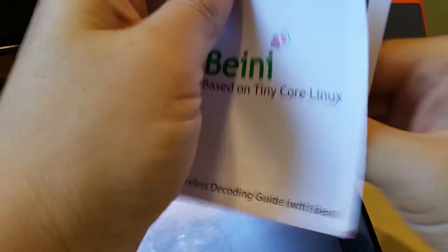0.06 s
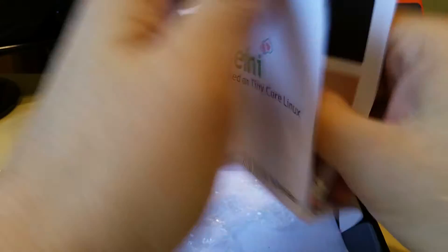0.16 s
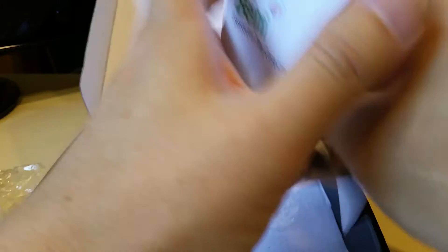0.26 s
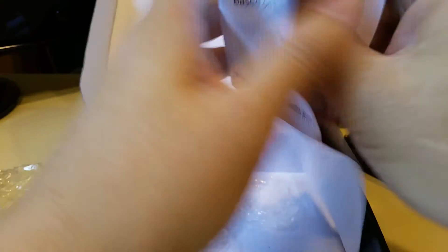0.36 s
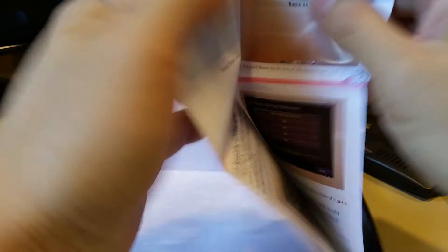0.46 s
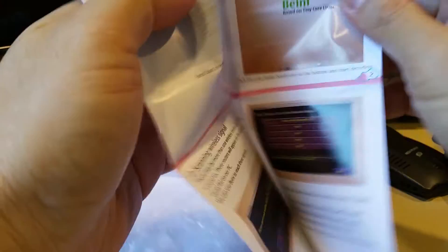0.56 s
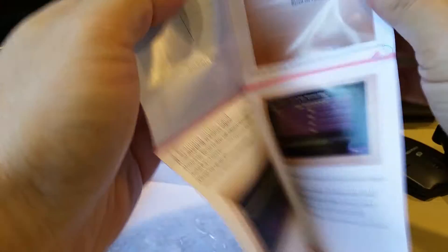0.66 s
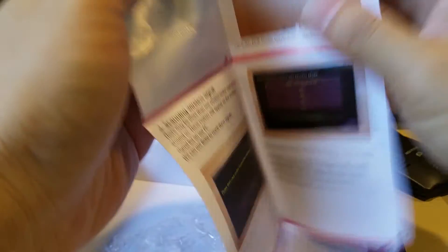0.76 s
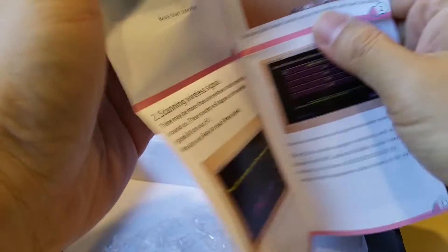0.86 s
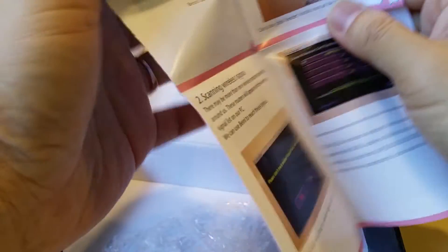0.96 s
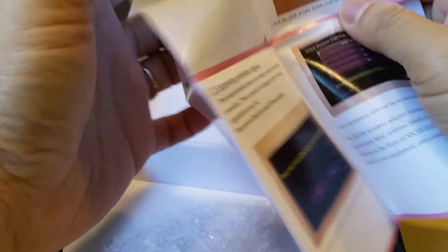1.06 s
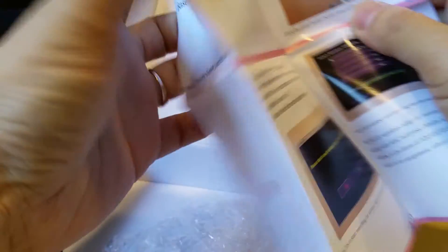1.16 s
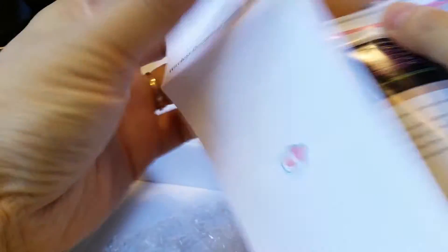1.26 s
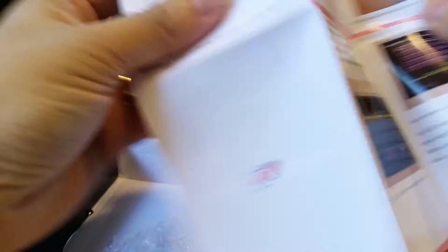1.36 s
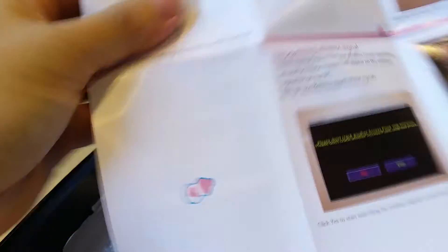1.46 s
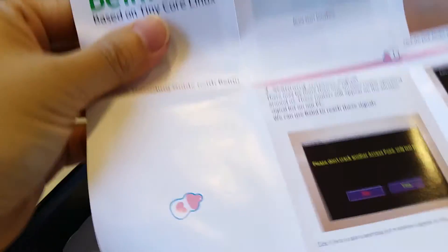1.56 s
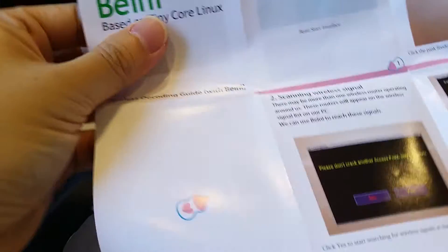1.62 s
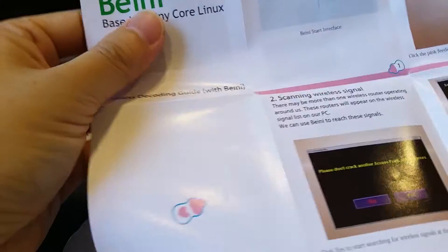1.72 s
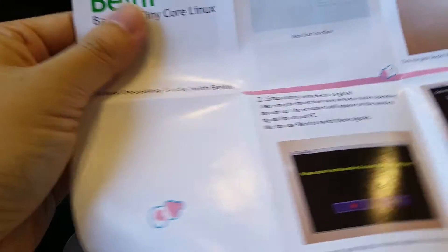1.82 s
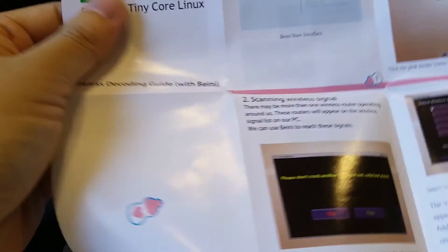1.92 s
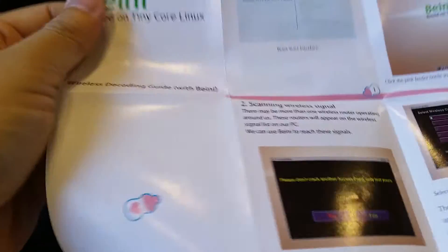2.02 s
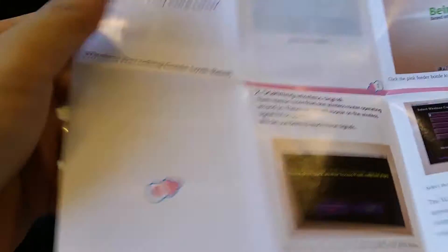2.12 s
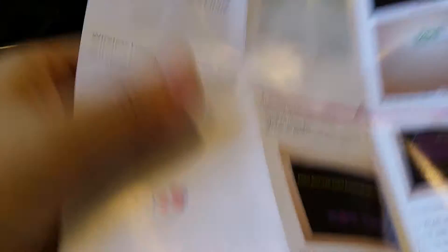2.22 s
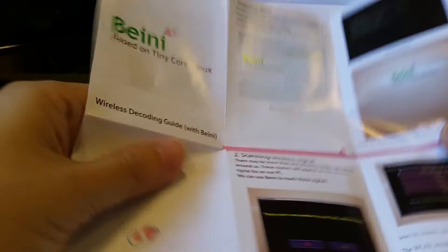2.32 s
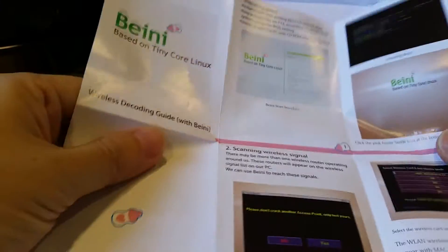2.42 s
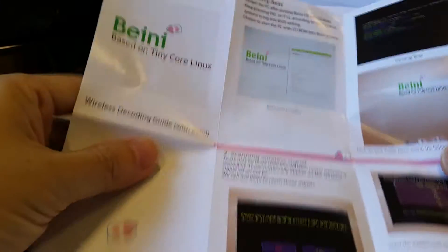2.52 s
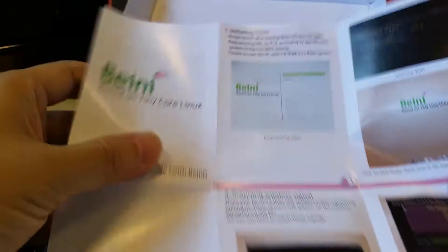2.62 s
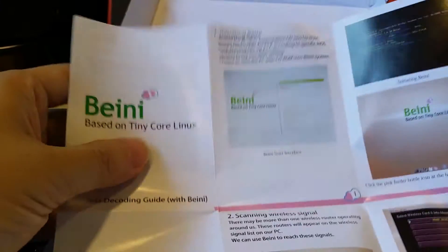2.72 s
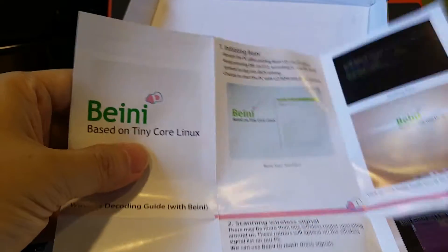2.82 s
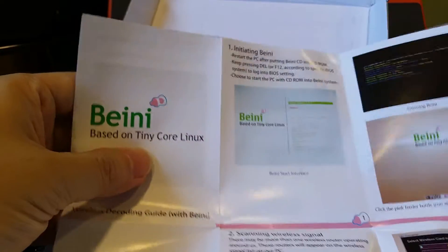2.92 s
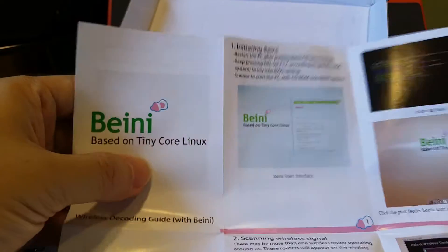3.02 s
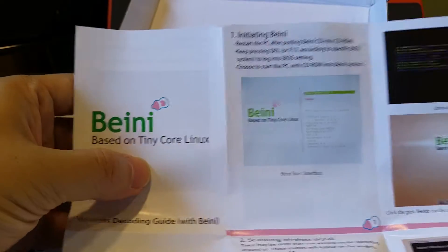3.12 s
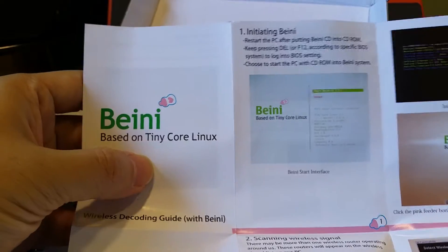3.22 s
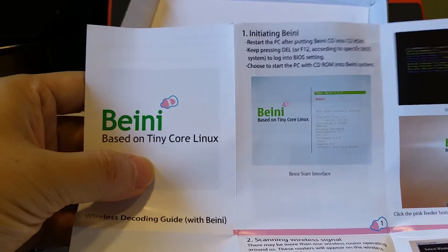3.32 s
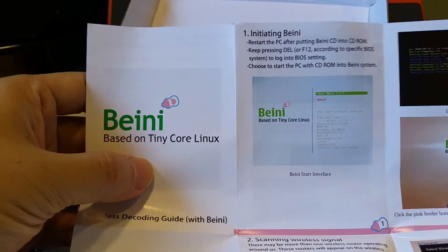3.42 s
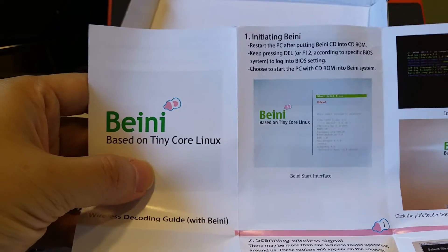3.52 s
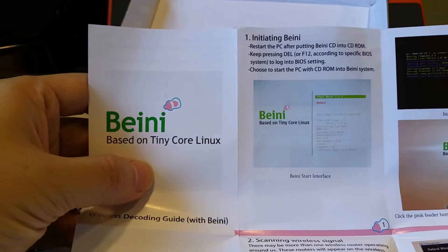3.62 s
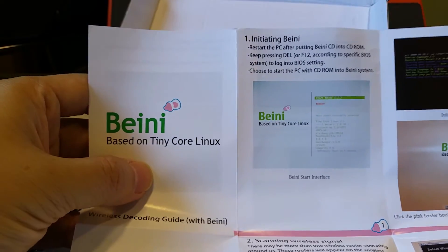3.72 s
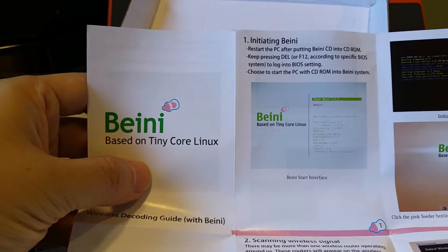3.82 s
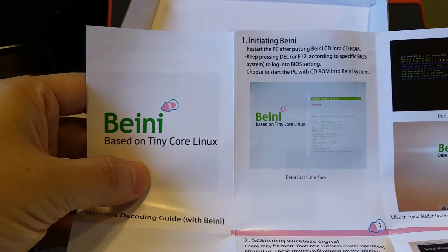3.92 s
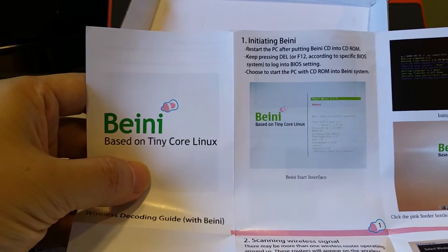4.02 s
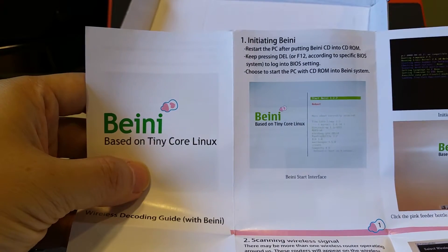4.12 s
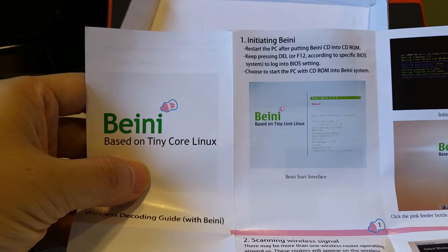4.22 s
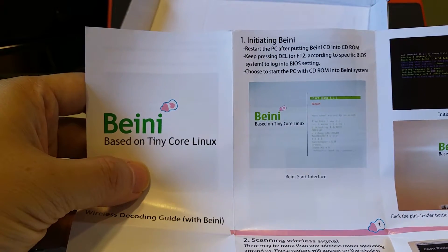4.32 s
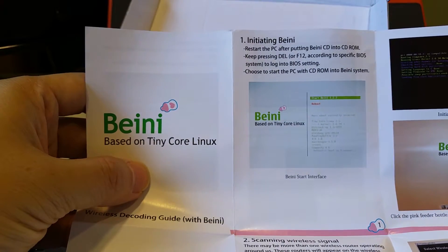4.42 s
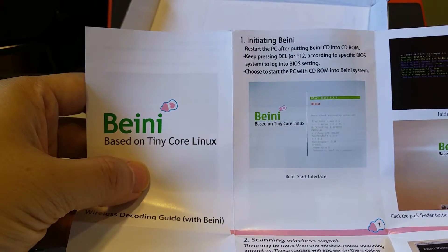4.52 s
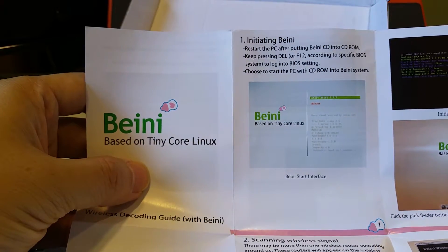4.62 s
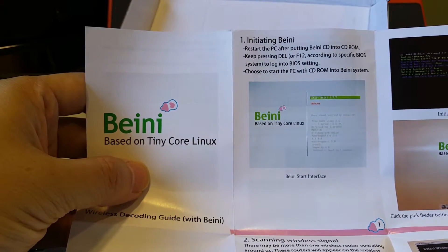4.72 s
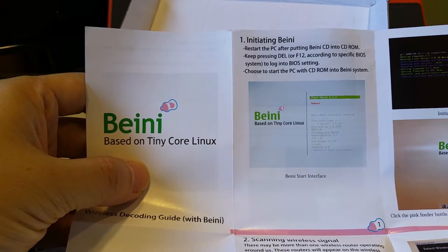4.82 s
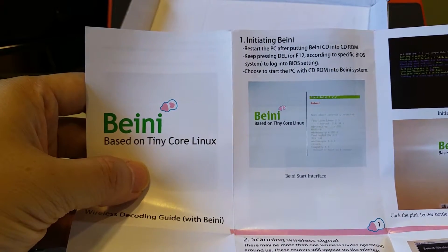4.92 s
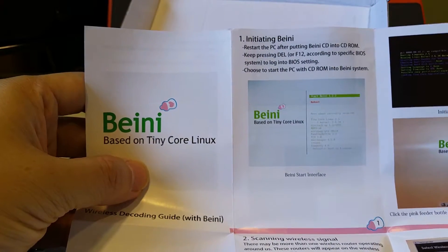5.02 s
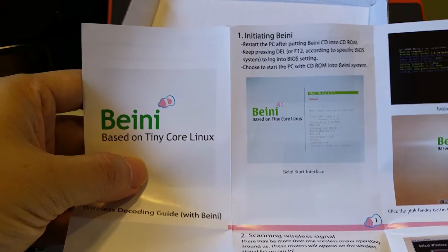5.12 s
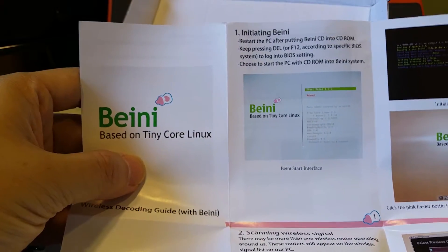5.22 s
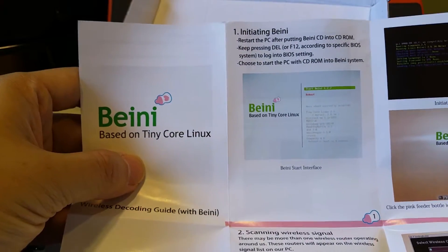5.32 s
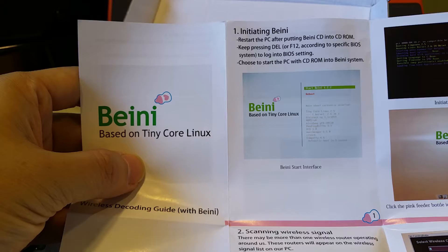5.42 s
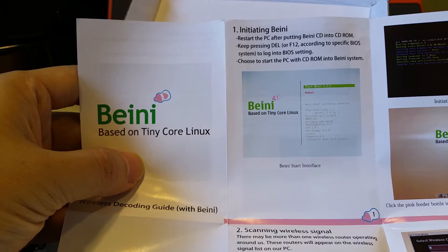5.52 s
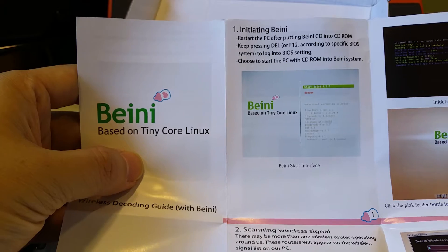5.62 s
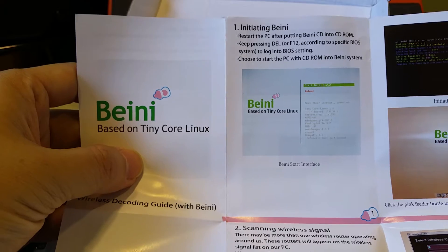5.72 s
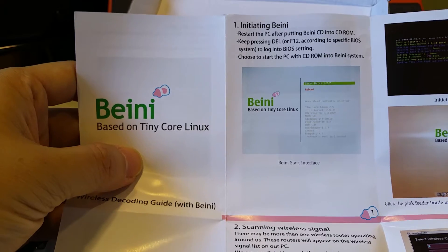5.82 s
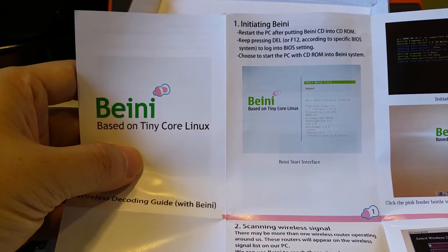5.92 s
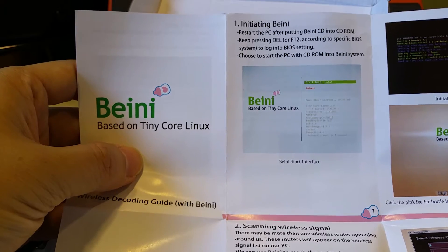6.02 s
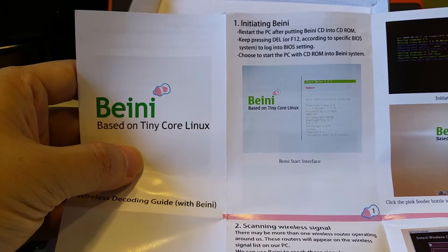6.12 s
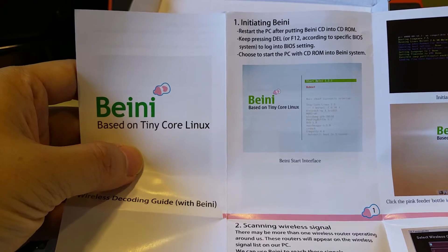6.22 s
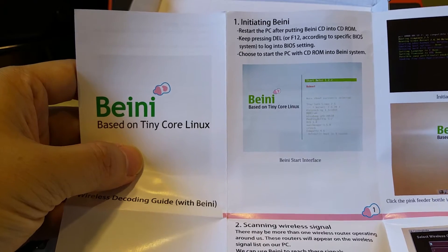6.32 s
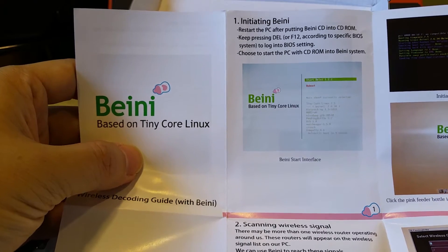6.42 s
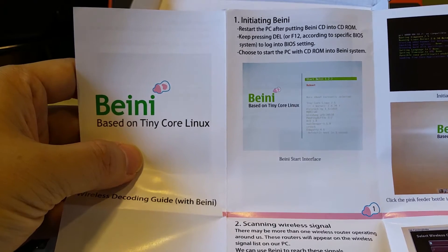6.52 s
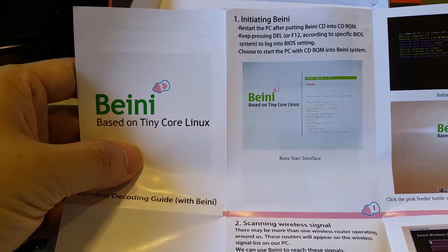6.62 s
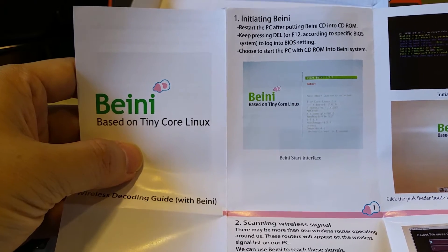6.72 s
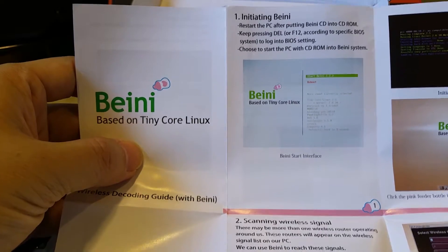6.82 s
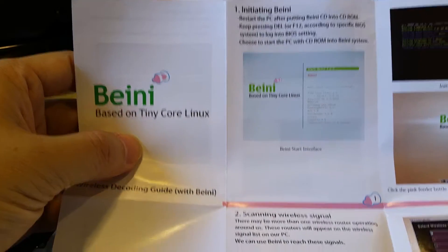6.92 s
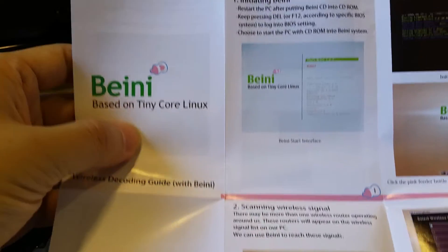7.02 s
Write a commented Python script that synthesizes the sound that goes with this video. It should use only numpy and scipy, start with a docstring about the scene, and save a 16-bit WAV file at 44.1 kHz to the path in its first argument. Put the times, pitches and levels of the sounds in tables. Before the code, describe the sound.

Stiff paper unfolds in sharp snaps and sliding hiss for three seconds, then only a faint airy hum remains, with one small late flex.

```python
"""Leaflet opened close to two microphones

A folded glossy leaflet is opened out by hand just in front of the microphones, then held still.
Sliding paper is random stick and slip, as hiss and rustle; wrinkles tick, edges scrape, a thumb rubs the gloss.
Creases snap as millisecond noise bursts; panels buckle with a low push of air, a dull flap and a rattle.
A small room answers briefly, and hums underneath with a rush of air, a faint tone and a swelling drone."""
import sys
import numpy as np
from scipy import signal
from scipy.fft import rfft, irfft
from scipy.io import wavfile

SR = 44100
rng = np.random.default_rng(int(sys.argv[2]) if len(sys.argv) > 2 else 0)


def digitize_waveform(pressure):
    """Quantize a signal to 16-bit integers and store it at the path in sys.argv[1].

    Rows of a 2-D input are taken as channels; values are limited to [-1, 1].
    """
    field = np.atleast_2d(pressure).T
    bounded = np.clip(field, -1, 1)
    quanta = np.round(bounded * 32767).astype(np.int16)
    wavfile.write(sys.argv[1], SR, quanta)


N = 311346
TIME = np.arange(N) / SR
BINS = np.fft.rfftfreq(N, 1 / SR)

# colour of creases and wrinkles giving way: frequency_hz, relative_level_db
CRACK_COLOUR = [(200, -18.5), (800, -5.5), (2300, -5.5), (4200, 1), (5500, -2), (7200, 3), (10000, -3),
                (16000, -8.5)]
# likeness of the paper sound at the two microphones: frequency_hz, coherence (0-1)
PAPER_LIKENESS = [(100, 0.99), (500, 0.86), (1500, 0.31), (4000, 0.28), (10000, 0.068)]


def amp(db):
    """Decibels to gain."""
    return 10 ** (np.asarray(db) / 20)


def unit(x):
    """Scales to an rms of one."""
    return x / np.sqrt(np.mean(x ** 2) + 1e-20)


def read(points, hz):
    """Reads a table on a log-frequency axis."""
    f, value = np.transpose(points)
    return np.interp(np.log(hz + 1), np.log(f + 1), value)


def pan(db):
    """Left and right gains for a level difference; positive is louder on the left."""
    gains = amp([[db / 2], [-db / 2]])
    return unit(gains)


def add(mix, start_s, sound):
    """Mixes a stereo sound in at a time, cut off at the end of the mix."""
    part = mix[:, max(round(start_s * SR), 0):][:, :sound.shape[1]]
    part += sound[:, :part.shape[1]]


def colour(x, spectrum, alike):
    """Gives two unrelated channels a spectrum and a likeness that depends on frequency."""
    a, b = rfft(x)
    same = np.clip(read(alike, BINS), -1, 1)
    second = same * a + np.sqrt(1 - same ** 2) * b
    return unit(irfft(np.array([a, second]) * amp(read(spectrum, BINS)), N))


def ring(x, gain_db, size=2048):
    """Passes a sound through a causal minimum-phase filter given as dB over frequency, keeping its energy."""
    hz = abs(np.fft.fftfreq(size, 1 / SR))
    log_gain = np.log(amp(np.maximum(gain_db(hz), -80)))
    taps = np.fft.ifft(np.exp(np.conj(signal.hilbert(log_gain)))).real
    y = signal.fftconvolve(x, taps[None, :size // 2], axes=1)
    return y * np.sqrt((x ** 2).sum(1, keepdims=True) / (y ** 2).sum(1, keepdims=True))


def crack_colour(x, bright_hz, neutral_hz=5600, lean_db=8):
    """The sheet's sharp sound, tilted dull or bright as its brightness departs from neutral."""
    tilt_db = lean_db * np.log2(bright_hz / neutral_hz)  # per octave, above 1500 Hz

    def gain_db(f):
        """Crack spectrum plus the tilt."""
        return read(CRACK_COLOUR, f) + tilt_db * np.log2(np.maximum(f, 1500) / neutral_hz)

    return ring(x, gain_db)


def slips(per_s, spread_db, slip_s):
    """Stick and slip: tiny decaying noise bursts of unequal size at random moments."""
    happens = rng.random(N) < per_s / SR
    sizes = amp(spread_db * np.minimum(rng.exponential(1, N), 4.5)) * happens
    power = signal.lfilter([1], [1, -np.exp(-2 / (slip_s * SR))], sizes ** 2)
    return unit(np.sqrt(power) * rng.standard_normal((2, N)))


def struck(burst, share):
    """Puts a share of a burst's energy into one sharp blow at its start."""
    energy = (burst ** 2).sum(1, keepdims=True)
    blow = np.sqrt(energy) * (np.arange(burst.shape[1]) == 0)
    return np.sqrt(1 - share) * burst + np.sqrt(share) * blow


def wander(per_s):
    """A smooth random curve with an rms of one: twelve slow sines, the fastest at per_s."""
    hz = np.geomspace(per_s / 6, per_s, 12)
    coarse_s = np.arange(0, N, 128) / SR
    phase_cycles = hz[:, None] * coarse_s + rng.random((len(hz), 1))
    curve = np.sin(2 * np.pi * phase_cycles).sum(0)
    return np.interp(TIME, coarse_s, unit(curve))


def off_the_sheet(x, bounce=0.78, path_s=0.000611, sway=0.5, moves_per_s=4):
    """The sound also arrives off a moving panel, so a comb of notches drifts through it."""
    late = []
    for channel in x:
        delay_s = path_s * np.exp(sway * wander(moves_per_s))
        late.append(np.interp(TIME - delay_s, TIME, channel))
    return unit(x + bounce * np.array(late))


def room_hum(air_db=-42.0, pan_db=1, waver_hz=1.18):
    """Fan-like rush of air in the room's standing waves, with a faint wavering tone and a low drone."""
    # rush of air, with the microphones' own faint hiss at the top: frequency_hz, relative_level_db
    air_colour = [(22, -26.5), (52, -7), (85, -9.5), (150, -6), (270, -2), (470, -6.5), (640, -14.5),
                  (1300, -17), (2500, -30), (3300, -39.5), (4000, -32.5), (5300, -53.5), (9800, -65),
                  (15500, -44.5)]
    # likeness of this background at the two microphones: frequency_hz, coherence (0-1)
    air_likeness = [(60, 0.8), (290, 0.89), (640, 0.52), (1400, 0), (3000, 0)]
    # standing waves that the air excites: frequency_hz, width_hz, level_db
    standing_waves = [(144.7, 12, -56.5), (186.8, 14.6, -55.5), (232.6, 39, -51), (440, 21, -58.5)]
    # the low drone swells: top_s, width_s, rise_db
    drone_swells = [(5.28, 0.14, 7.5), (5.76, 0.1, 11)]
    drone_hz, drone_floor_db = 57.8, -55
    fan_hz, fan_db = 263.2, -50.5

    def tone(hz):
        """A sine of unit rms whose pitch wavers."""
        return np.sqrt(2) * np.sin(2 * np.pi * np.cumsum(hz + waver_hz * wander(2.8)) / SR)

    air = amp(air_db) * colour(rng.standard_normal((2, N)), air_colour, air_likeness)
    for hz, width_hz, db in standing_waves:
        resonance = 1 / (1 + (2 * (BINS - hz) / width_hz) ** 2)
        air = air + amp(db) * unit(irfft(rfft(rng.standard_normal(N)) * resonance, N))
    drone_db = drone_floor_db
    for top_s, width_s, rise_db in drone_swells:
        drone_db = drone_db + rise_db * np.exp(-((TIME - top_s) / width_s) ** 2)
    return (air + amp(fan_db) * tone(fan_hz) + amp(drone_db) * tone(drone_hz)) * pan(pan_db)


def room(x, first_s=0.007):
    """Randomly spaced reflections, each frequency dying at its own rate, the lows soonest."""
    # the room's decay: frequency_hz, t60_s
    room_decay = [(150, 0.18), (1000, 0.39), (5000, 0.31), (14000, 0.44)]
    count = SR // 40
    at = np.arange(count) * 20 + rng.integers(0, 20, (2, count))  # one in every 20 samples
    taps = np.zeros((2, count * 20))
    signs = rng.choice([-1., 1.], at.shape)
    np.put_along_axis(taps, at, signs * (at > first_s * SR), 1)
    hz, t, bands = signal.stft(taps, SR, nperseg=256)
    decay_db = -60 * t / read(room_decay, hz)[:, None]
    tail = signal.istft(bands * amp(decay_db), SR, nperseg=256)[1]
    return signal.fftconvolve(x, tail / np.linalg.norm(tail[0]), axes=1)[:, :N]


def stroke_envelope(start_s, length_s, rise_s=0.02, fall_s=0.018, arch_db=1):
    """Gain of one hand movement: a quick rise, a shallow arch fullest midway, and a fade as the paper slows."""
    t = TIME - start_s
    rise = np.clip(t / rise_s, 0, 1)
    fade = 1 / (1 + np.exp(np.clip((t - length_s) / fall_s + 1, -30, 30)))
    arch = amp(-arch_db * np.clip(2 * t / length_s - 1, -1, 1) ** 2)
    return rise * fade * arch


def handling(creep_fine_db=-5):
    """Gains of hiss, finest hiss and rustle: the hands' strokes add their power to the creep in the grip."""
    # hand movements sliding paper over paper and skin, ahead of the layer trims:
    # start_s, length_s, hiss_db, rustle_db, hiss_above_8_khz_db (relative to the hiss)
    hand_strokes = [(-0.03, 0.13, -38.5, -53, 0), (0.17, 0.2, -34, -62, -3), (0.363, 0.21, -36.5, -55, -7),
                    (0.527, 0.29, -31, -33, -1.5), (0.892, 0.16, -40.5, -35, 0),
                    (1.089, 0.18, -37, -36.5, -1), (1.286, 0.44, -44, -39, -1),
                    (1.917, 0.41, -46.5, -45, -4), (2.128, 0.13, -38, -40.5, -4),
                    (2.336, 0.23, -38.5, -35, -7.5), (2.557, 0.37, -41.5, -44.5, -3),
                    (2.707, 0.08, -38.5, -42, -8), (3, 0.33, -46, -43.5, -15)]
    # paper creeping in the grip until the hands come to rest: time_s, hiss_db, rustle_db (ahead of trims)
    grip_creep = [(0, -41.5, -39), (1.4, -38.5, -46), (1.85, -50, -53), (3.3, -56.5, -48), (3.6, -67, -57),
                  (4.3, -78.5, -73), (7, -75, -72.5)]
    time_s, hiss_db, rustle_db = np.transpose(grip_creep)
    hiss = amp(np.interp(TIME, time_s, hiss_db))
    rustle = amp(np.interp(TIME, time_s, rustle_db))
    power = np.array([hiss, hiss * amp(creep_fine_db), rustle]) ** 2
    for start_s, length_s, hiss_db, rustle_db, fine_db in hand_strokes:
        gains = amp([[hiss_db], [hiss_db + fine_db], [rustle_db]])
        power = power + gains ** 2 * stroke_envelope(start_s, length_s) ** 2
    return np.sqrt(power)


def crinkle(hiss_gain, fine_db=-13.5, coarse_db=-12, coarse_hz=2400, busy_db=-38, steepness=1.015):
    """Tiny bright wrinkles and coarser dull ones give way singly, their level following the sliding hiss."""
    fine = colour(slips(per_s=68, spread_db=4.5, slip_s=0.000506), CRACK_COLOUR, PAPER_LIKENESS)
    coarse = unit(crack_colour(slips(per_s=70, spread_db=4.0, slip_s=0.0009), coarse_hz)[:, :N])
    ticks = amp(fine_db) * off_the_sheet(fine, bounce=0.8, moves_per_s=19)
    ticks = ticks + amp(coarse_db) * off_the_sheet(coarse, bounce=0.8, moves_per_s=19)
    return ticks * amp(busy_db) * (hiss_gain / amp(busy_db)) ** steepness


def rubs(trim_db=-1, soft=0.17, pan_db=2):
    """Skin slips on the gloss; the panel sounds in a narrow resonance near 790 Hz and a weaker near 2450 Hz."""
    # a thumb dragged over the glossy face: start_s, length_s, level_db (ahead of the trim)
    thumb_rubs = [(0.36, 0.16, -50.5), (0.974, 0.093, -44.5), (1.897, 0.25, -49.5), (2.106, .15, -45.5),
                  (3.15, 0.07, -45.5)]
    # the held panel under the thumb: frequency_hz, relative_level_db
    panel_colour = [(300, -4.5), (600, -36), (790, 21.5), (1050, -14), (1700, -8), (2050, 2), (2450, 11),
                    (3000, 0), (4500, -23), (8000, -37)]
    out = np.zeros((2, N))
    grain = colour(slips(per_s=600, spread_db=2.5, slip_s=0.003), panel_colour, PAPER_LIKENESS)
    for start_s, length_s, db in thumb_rubs:
        run = grain[:, round(start_s * SR):][:, :round(length_s * SR)]
        envelope = signal.windows.tukey(run.shape[1], soft)
        add(out, start_s, amp(db + trim_db) * unit(run) * envelope)
    return out * pan(pan_db)


def scrapes(trim_db=-4, soft=0.46):
    """An edge dragged quickly over the sheet is a short dense run of slips."""
    # edge strokes: start_s, length_s, level_db (ahead of the trim), brightness_hz, left_over_right_db
    edge_strokes = [(0.253, 0.036, -22, 6430, 0), (0.628, 0.021, -26.5, 7200, 3),
                    (0.869, 0.04, -32.5, 6900, -1), (0.946, 0.012, -26, 5400, 0),
                    (1.214, 0.011, -35.5, 7600, 7), (1.336, 0.022, -28.5, 5500, -10),
                    (1.466, 0.052, -22, 6750, -2.5), (1.577, 0.03, -25.5, 2760, 2),
                    (2.211, 0.014, -30, 5500, 0), (3.043, 0.055, -30.5, 1700, 1)]
    out = np.zeros((2, N))
    grain = off_the_sheet(slips(per_s=5700, spread_db=2.5, slip_s=0.002))
    for start_s, length_s, db, bright_hz, pan_db in edge_strokes:
        run = grain[:, round(start_s * SR):][:, :round(length_s * SR)]
        run = unit(run * signal.windows.tukey(run.shape[1], soft))
        add(out, start_s, amp(db + trim_db) * pan(pan_db) * crack_colour(run, bright_hz))
    return out


def sliding(hiss_gain, fine_gain, rustle_gain, hiss_db=-3.5, rustle_db=-1,
            hiss_pan_db=-1, rustle_pan_db=3.5, fine_hz=8000):
    """Fine slips hiss; coarser ones shake the panels, which rustle."""
    # fine slips: frequency_hz, relative_level_db
    hiss_colour = [(900, -21.5), (2500, -3.5), (3800, -3.5), (5300, -4.5), (7200, 0.5), (9500, -3),
                   (13000, -2), (16000, -8.5)]
    # shaken panels: frequency_hz, relative_level_db
    rustle_colour = [(30, -10), (55, -6.5), (90, 2), (250, 2.5), (550, -5), (780, 3.5), (1050, -6),
                     (1700, -9.5), (2300, -6.5), (3100, -14.5), (6000, -30.5)]
    hiss_slips = slips(per_s=6100, spread_db=3.5, slip_s=0.0009)
    hiss = off_the_sheet(colour(hiss_slips, hiss_colour, PAPER_LIKENESS))
    fine = irfft(rfft(hiss) / (1 + (fine_hz / (BINS + 1)) ** 8), N)  # the hiss above fine_hz
    rustle_slips = slips(per_s=700, spread_db=1.5, slip_s=0.0019)
    rustle = off_the_sheet(colour(rustle_slips, rustle_colour, PAPER_LIKENESS))
    moving_hiss = (hiss - fine) * hiss_gain + fine * fine_gain
    return (moving_hiss * amp(hiss_db) * pan(hiss_pan_db)
            + rustle * rustle_gain * amp(rustle_db) * pan(rustle_pan_db))


def rebounds(settle_s, count=5, first_gap_s=0.013, slowing=1.3, settled_db=-19.5):
    """A flip and its rebounds, ever wider apart and weaker: (delay s, level dB)."""
    gaps_s = first_gap_s * slowing ** np.arange(count - 1)
    delays_s = np.append(0, np.cumsum(gaps_s))
    return zip(delays_s, settled_db * delays_s / max(settle_s, 0.005))


def spread_sheet(x, loose_db=-6):
    """The more the leaflet is spread out, the more it drums as one sheet in a few damped modes."""
    # how far the leaflet is spread, so that it can ring as one sheet: time_s, share (0-1)
    spread_share = [(0, 0.27), (1.6, 0.17), (2.5, 0.2), (2.9, 1)]
    # modes of the spread sheet: frequency_hz, width_hz, level_db
    sheet_modes = [(177, 19, 6), (460, 66, -5), (1204, 180, -5.5)]
    drum = amp(loose_db) * x
    for hz, width_hz, db in sheet_modes:
        drum = drum + amp(db) * signal.lfilter(*signal.iirpeak(hz, hz / width_hz, fs=SR), x)
    share = np.clip(np.interp(TIME, *np.transpose(spread_share)), 0, 1)
    return (1 - share) * x + share * drum


def buckles(push_db=-3, push_hz=120, push_s=0.0037, flap_db=-2, flap_s=0.0069, rattle_db=-3, rattle_s=0.0038,
            rise_s=0.00031, flap_slope_db=26, rattle_slope_db=30, low_side=0.4,
            flap_apart=0.56, rattle_apart=0.74, pan_db=3.5):
    """A panel shoves the air in a low swing; bending waves flap and rattle over the sheet at each rebound."""
    # panels flipping to a new shape, ahead of the trims:
    # start_s, push_db, flap_db, flap_hz, rattle_db, settle_s (time to settle, taken as 0.005 at least)
    panel_flips = [(0.261, -28, -38, 392, -25, 0.0081), (0.5338, -19, -17.5, 520, -15.5, 0.036),
                   (0.618, -35.5, -29.5, 494, -38, .02), (0.7325, -22, -24.5, 440, -23, 0.018),
                   (0.7451, -24, -29, 476, -45, 0.024), (0.894, -26, -50, 333, -41, 0.027),
                   (0.9383, -28.5, -23, 674, -29.5, 0.079), (1.032, -39, -29, 630, -30.5, .02),
                   (1.3445, -36.5, -28.5, 555, -25.5, 0.028), (1.406, -39, -28.5, 670, -38.5, 0.0092),
                   (1.4623, -39, -24.5, 620, -24.5, 0.076), (1.583, -14, -23.5, 640, -18, 0.029),
                   (1.8935, -50, -32, 650, -31.5, 0.014), (2.084, -50.5, -32, 770, -40, 0.0092),
                   (2.3461, -29, -29.5, 480, -36, 0.0197), (2.3678, -25.5, -29.5, 654, -26.5, 0.028),
                   (2.407, -25.5, -34, 563, -30.5, .02), (2.4647, -32.5, -20.5, 764, -20.5, 0.027),
                   (2.575, -37, -26.5, 423, -48, 0.3), (2.809, -24.5, -20.5, 440, -24.5, .03),
                   (3.0219, -25.5, -12.5, 460, -27.5, 0.0033), (3.033, -19, -15.5, 440, -22, .14),
                   (3.39, -42, -37, 520, -51, .01), (5.59, -32, -36, 460, -37, .02),
                   (5.607, -28, -29.5, 350, -36, 0.023)]
    # the rattle sinks as more paper comes free, until the leaflet is open
    rattle_folded_hz, rattle_open_hz, open_s = 2445, 1416, 2.12
    out, t = np.zeros((2, N)), np.arange(SR // 12) / SR

    def start_rms(y):
        """Rms of the first 6 ms or so."""
        return np.sqrt(np.mean(y[..., :SR // 170] ** 2))

    def waves(centre_hz, decay_s, slope_db, apart):
        """A dying burst in a broad resonance whose upper side is the steeper one."""
        noise = rng.standard_normal((3, len(t)))
        shape = np.exp(-t / decay_s) * (1 - np.exp(-t / rise_s))
        burst = struck((noise[2] + apart * noise[:2]) * shape, share=0.12)

        def hump(f):
            """Resonance in dB, rounded at the top."""
            octaves = np.log2((f + 1) / centre_hz)
            return -np.hypot(5, slope_db * np.maximum(-low_side * octaves, octaves))

        y = ring(burst, hump)[:, :len(t)]
        return unit(y) * np.sqrt(np.mean(shape ** 2)) / start_rms(shape)

    for start_s, push, flap, flap_hz, rattle, settle_s in panel_flips:
        opened = min(start_s / open_s, 1)
        rattle_hz = rattle_folded_hz * (rattle_open_hz / rattle_folded_hz) ** opened
        for delay_s, db in rebounds(settle_s):
            swing_hz = push_hz * rng.uniform(1.0, 1.31)
            swing = np.sin(2 * np.pi * swing_hz * t) * np.exp(-t / push_s)
            pop = (amp(push + push_db) * swing / start_rms(swing)
                   + amp(flap + flap_db) * waves(flap_hz, flap_s, flap_slope_db, flap_apart)
                   + amp(rattle + rattle_db) * waves(rattle_hz, rattle_s, rattle_slope_db, rattle_apart))
            add(out, start_s + delay_s, amp(db) * pop * pan(pan_db))
    # a small sheet radiates no deep bass
    return signal.sosfilt(signal.butter(2, 45, "high", fs=SR, output="sos"), out)


def snaps(trim_db=-2.0, crack_s=0.00059, after_s=0.015, after_db=-24, shared=0.31, far_delay_s=0.0003):
    """Fibres in a crease crack within about a millisecond, and the sheet shivers briefly after it."""
    # creases giving way: start_s, level_db (ahead of the trim), brightness_hz, left_over_right_db
    crease_snaps = [(0.047, -24, 7760, -0.5), (0.0862, -27.5, 5730, -3.5), (0.2611, -16, 3940, 5),
                    (0.281, -16.5, 7630, -15), (0.5558, -15, 4160, 9), (0.7323, -22, 3690, 0),
                    (0.7443, -17, 3990, -4), (0.954, -24, 5600, -7.5), (1.0536, -20, 8080, -1),
                    (1.1368, -21, 6700, -1), (1.1715, -22.5, 9000, -1.5), (1.1917, -14, 9200, -8.5),
                    (1.3132, -23.5, 6900, 13), (1.335, -16, 7800, 0), (1.345, -20, 5300, 9),
                    (1.4617, -18.5, 3700, 1), (1.5846, -15.5, 2840, -12), (2.3455, -30, 4600, -6.5),
                    (2.406, -26.5, 5000, 2.5), (2.4639, -14.5, 4540, 9.5), (2.466, -13.5, 4430, -0.5),
                    (2.809, -28, 3140, -1.5), (3.0328, -19, 1680, -0.5), (3.6805, -50.5, 3800, 0),
                    (5.597, -35, 1600, -0.5), (5.6038, -33.5, 1610, 14), (5.6138, -35.5, 2000, -7),
                    (5.6803, -40.5, 1996, -2)]
    out, t = np.zeros((2, N)), np.arange(SR // 40) / SR
    shape = np.exp(-t / crack_s) + amp(after_db) * np.exp(-t / after_s)
    for start_s, db, bright_hz, pan_db in crease_snaps:
        noise = rng.standard_normal((3, len(t)))
        burst = (noise[:2] + shared * noise[2]) * shape
        crack = crack_colour(struck(burst, share=0.046), bright_hz)
        # level is set over the first 2 ms
        crack = crack / np.sqrt(np.mean(crack[:, :SR // 500] ** 2, axis=1, keepdims=True))
        far = int(pan_db >= 0)  # the quieter microphone is the farther one and hears it later
        crack[far] = np.roll(crack[far], round(far_delay_s * SR))
        add(out, start_s, amp(db + trim_db) * pan(pan_db) * crack)
    return out


def scene(sharp_room_db=-9, dull_room_db=-9):
    """The leaflet close by, its reflections, and the room."""
    hiss_gain, fine_gain, rustle_gain = handling()
    sharp = snaps() + scrapes()
    dull = spread_sheet(buckles())
    reflections = room(amp(sharp_room_db) * sharp + amp(dull_room_db) * dull)
    soft = sliding(hiss_gain, fine_gain, rustle_gain) + crinkle(hiss_gain) + rubs()
    return room_hum() + reflections + soft + dull + sharp


def record(dry, edge_hz=16000):
    """The recorder's band limit: a steep linear-phase low-pass."""
    taps = signal.firwin(511, edge_hz, window=("kaiser", 9), fs=SR)
    return signal.oaconvolve(dry, taps[None], "same")


dry = scene()
out = record(dry)
digitize_waveform(out)
```